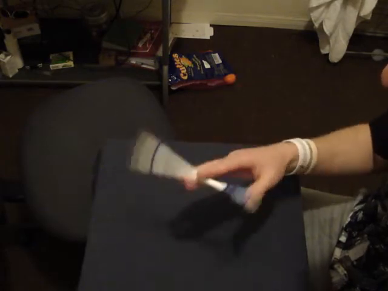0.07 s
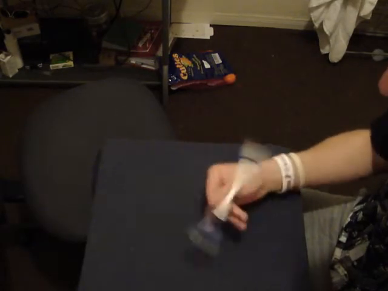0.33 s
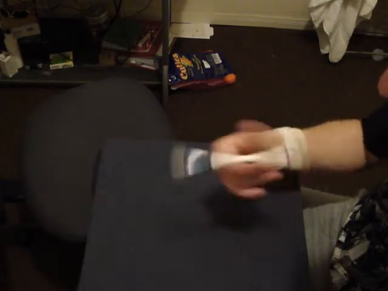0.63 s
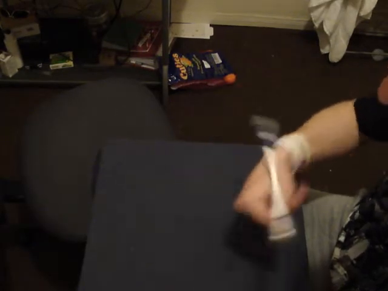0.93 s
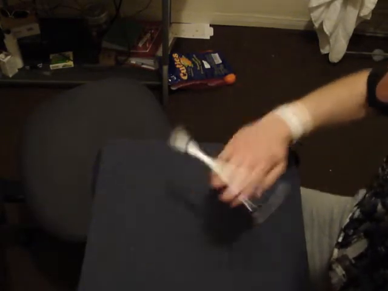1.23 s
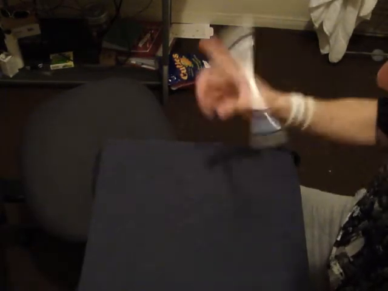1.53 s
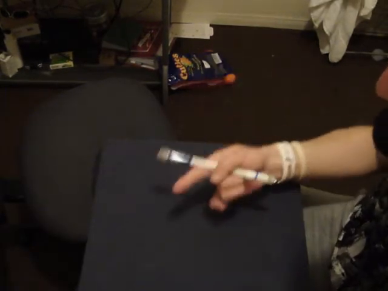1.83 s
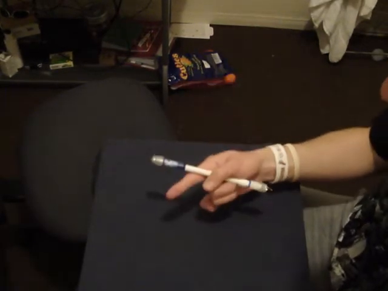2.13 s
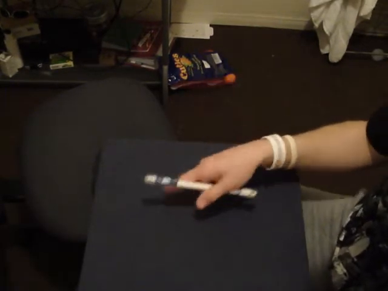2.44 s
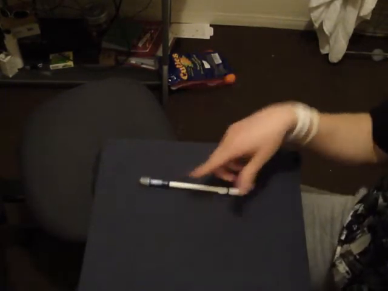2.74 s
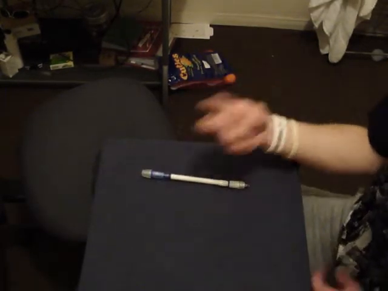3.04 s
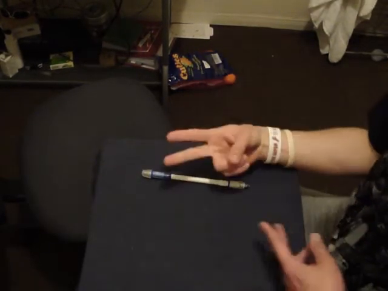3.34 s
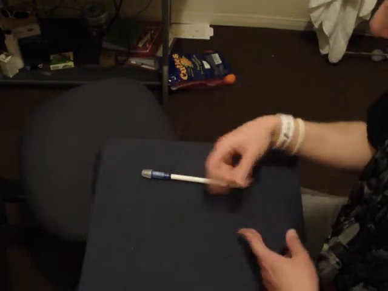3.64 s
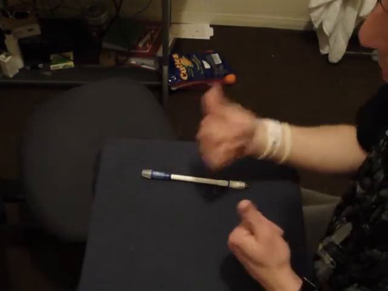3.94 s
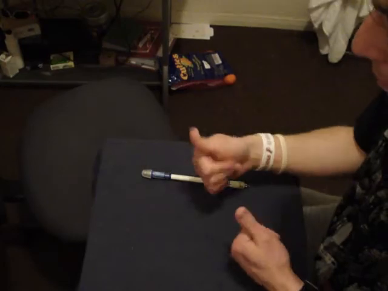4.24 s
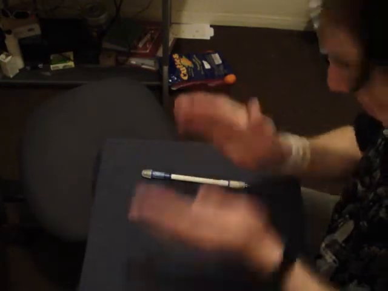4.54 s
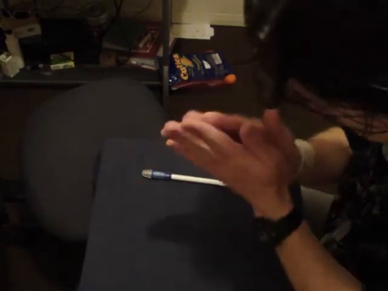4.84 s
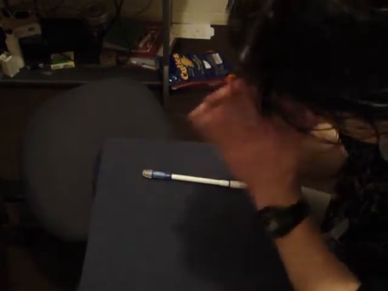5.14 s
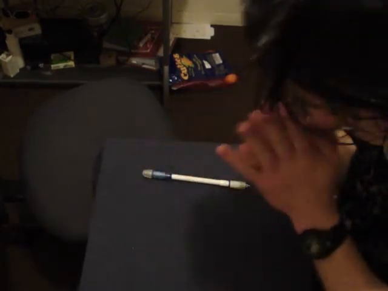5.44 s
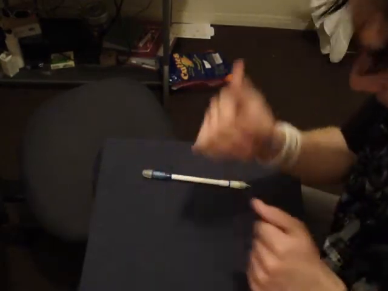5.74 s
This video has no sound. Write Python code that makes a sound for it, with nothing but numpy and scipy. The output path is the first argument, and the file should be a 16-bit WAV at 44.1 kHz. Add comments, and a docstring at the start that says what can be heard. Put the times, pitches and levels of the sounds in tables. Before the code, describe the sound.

A spinning pen clicks faintly against fingers, then drops with a loud knock on a cloth-covered board, followed by two light claps, over hiss.

```python
"""Steady hiss, a thin electrical buzz and a faint whine fill a small furnished room.
A sleeve stirs as a pen spins round the fingers, sliding on skin and clicking against them twice.
The pen drops on a cloth-covered board, which knocks and rings; it bounces and scuffs to rest.
The empty hands make signs, with small ticks and brushes of skin, then clap twice, ringing the air
trapped between the palms. The room answers each contact with a short tail."""
import sys
import numpy as np
from scipy import signal
from scipy.fft import rfft, irfft
from scipy.io import wavfile
from scipy.ndimage import uniform_filter1d

SR = 44100
rng = np.random.default_rng(int(sys.argv[2]) if len(sys.argv) > 2 else 0)


def wrap_up_sound(samples):
    """Save the sound to the file named by the first command line argument, as 16-bit audio."""
    columns = np.atleast_2d(samples).T
    # keep every value between -1 and 1, then stretch to whole-number steps
    tamed = np.clip(columns, -1, 1)
    steps = np.round(tamed * 32767).astype(np.int16)
    wavfile.write(sys.argv[1], SR, steps)


N = 254942
TIME = np.arange(N) / SR
AGE = np.arange(SR // 2) / SR  # seconds since a contact
IMPULSE = 1. * (AGE == 0)
MS = 1e-3


def undb(db):
    """Decibels to gain."""
    return 10 ** (np.asarray(db) / 20)


def level(x, db):
    """Set a steady sound to an rms level."""
    return x * undb(db) / np.sqrt(np.mean(x ** 2))


def hit(x, db):
    """Scale a short sound so that its energy equals 10 ms at the given level."""
    return x * undb(db) / np.sqrt(np.sum(x ** 2) / (10 * MS * SR))


def decay(t60_s):
    """Exponential decay after a contact."""
    return np.exp(-np.log(1000) * AGE / t60_s)


def envelope(start_s, attack_s, hold_s, fall_db_per_s):
    """A gain that rises, holds, then falls at a steady rate."""
    age = TIME - start_s
    return np.clip(age / attack_s, 0, 1) * undb(-fall_db_per_s * np.maximum(age - attack_s - hold_s, 0))


def drift(rate_hz, depth_db):
    """A gain that wanders at random."""
    steps = rng.standard_normal(int(TIME[-1] * rate_hz) + 2)
    return undb(depth_db * np.tanh(np.interp(TIME * rate_hz, np.arange(len(steps)), steps)))


def read_curve(hz, points):
    """Read (freq_hz, value) points on a log-frequency axis."""
    freqs, values = np.transpose(points)
    return np.interp(np.log(np.maximum(hz, 1)), np.log(freqs), values)


def eq(x, points, size=4096):
    """Minimum-phase EQ through (freq_hz, gain_db) points."""
    gain = undb(read_curve(np.fft.rfftfreq(size, 1 / SR), points))
    cepstrum = irfft(np.log(gain))
    cepstrum[1:size // 2] *= 2
    cepstrum[size // 2 + 1:] = 0
    return signal.fftconvolve(x, irfft(np.exp(rfft(cepstrum))))[:len(x)]


def resonate(x, hz, width_hz):
    """One resonance, gain 1 at its centre."""
    return signal.lfilter(*signal.iirpeak(hz, hz / width_hz, fs=SR), x)


def ping(x, hz, skirt_db):
    """A narrow ring on a broad skirt of the same sound."""
    skirt = resonate(x, hz, width_hz=hz)
    return resonate(skirt, hz, width_hz=500) + undb(skirt_db) * skirt


def flatten(x, width_hz):
    """Spread a burst's energy evenly over frequency, keeping detail finer than the width."""
    spectrum = rfft(x)
    power = uniform_filter1d(np.abs(spectrum) ** 2, max(1, int(width_hz * len(x) / SR)))
    return irfft(spectrum / np.sqrt(power), len(x))


def crack(t60_s):
    """A toneless burst of many tiny contacts dying away."""
    burst = rng.standard_normal(len(AGE)) * decay(t60_s)
    return flatten(burst, width_hz=220) * decay(10 * t60_s)


def add(track, start_s, x):
    """Mix x into the track."""
    i = int(start_s * SR)
    track[i:i + len(x)] += x[:len(track) - i]


def echo(x, delay_ms, db):
    """One reflection of a sound."""
    t = TIME[:len(x)]
    return undb(db) * np.interp(t - delay_ms * MS, t, x, left=0)


# Tone of the noise bed: freq_hz, gain_db
HISS_EQ = [(15, -37), (25, -24), (48, -12.5), (96, -11), (186, 0), (351, -0.5), (430, 0), (475, 1),
           (540, -1), (790, -2), (1100, -4.5), (2960, -10.5), (8380, -16), (9510, -17.5), (10800, -19),
           (14000, -105), (22000, -120)]


def hiss(level_db=-54.5):
    """An even bed of noise, fullest in the low mids."""
    return level(eq(rng.standard_normal(N), HISS_EQ), level_db)


# Spells in which the buzz spits harder and rings: start_s, hold_s, level_db, ring_hz
BUZZ_FLARES = [(.065, .05, -62.5, 4350), (0.548, 0.029, -68, 4600), (1.86, .015, -61.5, 5560),
               (2.035, 0.1, -70.5, 4700), (4.286, .028, -57, 5540), (4.653, 0.013, -58, 5330),
               (4.686, .028, -59.5, 5550)]


def electrical_buzz(mains_hz=59.94, sizzle_db=-72, rasp_db=-70, whine_db=-73):
    """One spit of treble per mains cycle sizzles, rasps and flares; a faint whine comes and goes."""
    phase = (TIME - .004) * mains_hz % 1
    spit = rng.standard_normal(N) * np.exp(-phase / .08)
    sizzle = resonate(resonate(spit, 9240, 1100), 9240, 1100) * drift(rate_hz=8, depth_db=3.5)
    whine = resonate(resonate(rng.standard_normal(N), 2898, 55), 2898, 55)
    rasp = resonate(spit, 6100, 3600) * drift(rate_hz=6.28, depth_db=1.5)
    out = level(sizzle, sizzle_db) + level(rasp, rasp_db)
    out += level(whine * drift(rate_hz=14, depth_db=10), whine_db)
    for start_s, hold_s, level_db, ring_hz in BUZZ_FLARES:
        flare = level(ping(spit, ring_hz, skirt_db=-14), level_db)
        out += flare * envelope(start_s, MS, hold_s, fall_db_per_s=2000)
    return out


def sleeve(level_db=-60.5):
    """The arm driving the spin stirs a soft, low rustle that slowly fades."""
    tone = [(60, -40), (130, -5), (180, 1.5), (240, 9), (450, 1), (1000, -26), (4000, -50), (10000, -36)]
    rustle = level(eq(rng.standard_normal(N), tone), level_db)
    return rustle * envelope(start_s=0, attack_s=MS, hold_s=0.37, fall_db_per_s=4.5)


# Tone of the plastic barrel: freq_hz, gain_db
BARREL_EQ = [(80, -33), (300, -22), (900, 0.5), (1900, -2.5), (2900, -2.5), (4200, 0.5), (7000, 0),
             (10000, 1.5), (12000, -8)]
# Bending modes of the barrel: pitch_hz, width_hz, gain_db
BARREL_RING = [(1940, 150, 5.5), (4200, 350, -6), (6000, 600, -2), (8160, 400, -1), (9800, 600, -2)]


def barrel(touch):
    """A touch on the pen's plastic tube comes out bright, with a short ring."""
    bright = eq(touch, BARREL_EQ)
    return bright + sum(undb(db) * resonate(bright, hz, width_hz) for hz, width_hz, db in BARREL_RING)


def pen_slide(low_cut_hz=3300, level_db=-61):
    """Skin slides along the barrel early in the spin: a soft, high swish."""
    low_cut = signal.butter(2, low_cut_hz, "highpass", fs=SR, output="sos")
    friction = signal.sosfilt(low_cut, rng.standard_normal(N))
    swish = level(barrel(friction), level_db)
    return swish * envelope(start_s=0.36, attack_s=0.023, hold_s=0.049, fall_db_per_s=75)


# Pen meets finger, the last two rows heard as one click: start_s, click_db, thud_db
FINGER_HITS = [(0.8091, -42, -49.5), (1.2442, -41, -40.5), (1.247, -37.5, -69)]


def pen_clicks():
    """The barrel clicks as it is caught; the finger under it gives a dead thud."""
    out = np.zeros(N)
    flesh = resonate(resonate(IMPULSE, 470, 170), 740, 240)
    for start_s, click_db, thud_db in FINGER_HITS:
        click = barrel(crack(t60_s=0.0073))
        add(out, start_s, hit(click, click_db) + hit(flesh, thud_db))
    return room(out + echo(out, delay_ms=5.8, db=-10), wet_db=-5.5)


# Reverb time of the furnished room: freq_hz, t60_s
ROOM_DECAY = [(200, 0.16), (600, 0.14), (1600, 0.25), (4000, 0.2), (10000, 0.087)]


def room(x, wet_db, gap_ms=7):
    """The sound plus a diffuse tail that dies at its own rate in each octave."""
    hz = np.fft.rfftfreq(len(AGE), 1 / SR)
    noise = rfft(rng.standard_normal(len(AGE)))
    octave = np.round(np.log2(np.clip(hz, 128, 8192)))
    tail = sum(irfft(noise * (octave == k), len(AGE)) * decay(read_curve(2 ** k, ROOM_DECAY))
               for k in np.unique(octave))
    # the walls answer only after a short gap
    window = np.clip(AGE / (gap_ms * MS) - .5, 0, 1) * np.clip(2 - 6 * AGE, 0, 1)
    tail = flatten(tail * window, width_hz=55) * window
    return x + undb(wet_db) * signal.fftconvolve(x, tail / np.linalg.norm(tail))[:N]


# Fingers brush the barrel or the palm: start_s, level_db, length_s, resonance_hz, high_cut_hz
FINGER_BRUSHES = [(1.387, -54.5, 0.021, 2900, 8000), (3.475, -52.5, 0.027, 1810, 2500),
                  (3.852, -47.5, 0.019, 900, 6000), (3.861, -44.5, 0.0086, 2260, 10000),
                  (4.37, -51.5, 0.0035, 1850, 3000), (4.428, -45.5, 0.021, 1720, 3530),
                  (4.95, -49, 0.0077, 1730, 8000), (5.175, -49, 0.015, 1900, 2520)]


def skin_brushes():
    """Each light rub of skin is a quick swell of friction noise with one resonance."""
    tone = [(80, -20), (250, -4), (700, 7.5), (2000, 3), (4000, 0.5), (10000, -2)]
    out = np.zeros(N)
    for start_s, level_db, length_s, resonance_hz, high_cut_hz in FINGER_BRUSHES:
        swell = AGE * np.exp(-2 * AGE / length_s)
        rub = eq(rng.standard_normal(len(AGE)) * swell, tone)
        rub = signal.lfilter(*signal.butter(2, high_cut_hz, fs=SR), rub)
        ring = undb(-0.5) * resonate(rub, resonance_hz, width_hz=700)
        add(out, start_s, hit(rub + ring, level_db))
    return out


# Pen lands and bounces on the board: start_s, level_db, contact_ms
BOUNCES = [(2.5408, -30, 1.1), (2.5452, -26.5, 0.4), (2.5470, -14, 0.59), (2.6496, -27.5, 1.43),
           (2.821, -50, 3), (2.845, -50, 5.1)]
# Modes of the board: pitch_hz, gain_db, t60_s
BOARD_MODES = [(165.8, -13, 0.35), (292, 0, 0.16), (389, 2.5, 0.19), (468, -5.5, 0.15), (534, -9, 0.19),
               (583, -8, 0.13), (632, -3, 0.15), (664, -0.5, 0.27), (727, -4, 0.25), (759, -7, 0.29),
               (814, -4, 0.19), (883, -2.5, 0.26), (1193, -11, 0.21), (1250, -8, 0.31), (1425, -10, 0.25),
               (1730, -23, 0.14), (2180, -7, 0.13)]
# Tone of the dead knock at the point of contact: freq_hz, gain_db
KNOCK_EQ = [(25, -66), (100, -28), (210, -13), (310, 3), (550, 3), (780, 3), (1050, -4.5), (1500, -7.5),
            (2600, -14.5), (5000, -18), (10000, -48)]


def pen_drop(ring_db=-2.5):
    """Each landing is a push cushioned by cloth: the longer the contact, the duller the board rings."""
    # neighbouring modes move in opposite senses, so the ring builds just after the knock
    ring = sum((-1) ** k * undb(db) * np.sin(2 * np.pi * hz * AGE) * decay(t60_s)
               for k, (hz, db, t60_s) in enumerate(BOARD_MODES))
    knock = eq(IMPULSE, KNOCK_EQ)
    # nearby furniture throws the knock back
    knock = knock + echo(knock, delay_ms=6.1, db=-4.5) + echo(knock, delay_ms=13.1, db=-4)
    board = hit(knock, 0) + hit(ring, ring_db)
    out = np.zeros(N)
    for start_s, level_db, contact_ms in BOUNCES:
        push = AGE ** 2 * decay(contact_ms * MS)
        landing = signal.fftconvolve(board, push)[:len(AGE)]
        add(out, start_s, hit(landing, level_db))
    return room(out, wet_db=-7, gap_ms=9.5)


# Tone of rubbed cloth: freq_hz, gain_db
CLOTH_EQ = [(150, -28), (400, 7), (1200, 3), (2200, -2), (3200, -4.5), (5000, -5), (8500, -8),
            (11000, -13.5)]


def cloth_scuff(grain_db=4, level_db=-36.5):
    """Pen and fingers skid to rest over the weave, a dense run of uneven catches that rings the pen."""
    grain = rng.standard_normal(N) * undb(grain_db * rng.standard_normal(N))
    catches = eq(grain, CLOTH_EQ)
    pen_ring = undb(4.5) * resonate(catches, 2200, 130)
    bite = envelope(start_s=2.683, attack_s=0.0079, hold_s=0.0041, fall_db_per_s=237)
    return room(level(catches + pen_ring, level_db) * bite, wet_db=-7)


# Ticks of the opening fist: start_s, level_db, ring_hz
FIST_TICKS = [(3.078, -52, 3380), (3.087, -55, 3220)]


def fist_creak():
    """The fist opens with a small dry creak: very short clicks, each with one ring."""
    out = np.zeros(N)
    for start_s, level_db, ring_hz in FIST_TICKS:
        tick = ping(crack(t60_s=0.015), ring_hz, skirt_db=-12)
        add(out, start_s, hit(tick, level_db))
    return out


# Tone of slapped skin: freq_hz, gain_db
SKIN_EQ = [(50, -29), (140, -18), (290, 5.5), (480, 8), (980, 7), (2000, 4.5), (2600, 3), (3200, 0),
           (4200, -3), (7500, -2), (11000, -10.5)]
# The palms meet and trap air: start_s, slap_db, air_db, air_hz, air_lag_ms
PALM_HITS = [(4.6084, -37, -39.5, 1640, .8), (4.8007, -30, -27, 1470, 3.8)]


def claps(overtone_db=-8):
    """Fingers graze, palms slap and fingers close, while the air trapped between the palms rings."""
    # graze, slap, close: offset_ms, gain_db, t60_s
    contacts = [(-6.9, -15.5, 0.027), (0, 0, 0.027), (8.6, -6.5, 0.014)]
    squeeze = eq(IMPULSE, SKIN_EQ)
    out = np.zeros(N)
    for start_s, slap_db, air_db, air_hz, air_lag_ms in PALM_HITS:
        for offset_ms, gain_db, t60_s in contacts:
            smack = eq(crack(t60_s), SKIN_EQ)
            add(out, start_s + offset_ms * MS, hit(smack, slap_db + gain_db))
        pop = hit(resonate(squeeze, air_hz, width_hz=110), air_db)
        overtone = hit(resonate(squeeze, 1.93 * air_hz, width_hz=950), air_db + overtone_db)
        add(out, start_s + air_lag_ms * MS, pop + overtone)
    return room(out + echo(out, delay_ms=8.5, db=-15.5), wet_db=-4)


def scene():
    """The mono mix, heard from above the board."""
    pen = pen_clicks() + pen_slide() + pen_drop() + cloth_scuff()
    hands = claps() + room(fist_creak() + skin_brushes(), wet_db=-4)
    bed = sleeve() + hiss() + electrical_buzz()
    return (pen + hands + bed)[None]


def record(dry, low_cut_hz=32, high_cut_hz=11000):
    """Master EQ: thin the deepest bass and cut the top steeply."""
    low_cut = signal.butter(2, low_cut_hz, "highpass", fs=SR, output="sos")
    high_cut = signal.ellip(10, .2, 70, high_cut_hz, fs=SR, output="sos")
    return signal.sosfilt(high_cut, signal.sosfilt(low_cut, dry))


dry = scene()
out = record(dry)
wrap_up_sound(out)
```